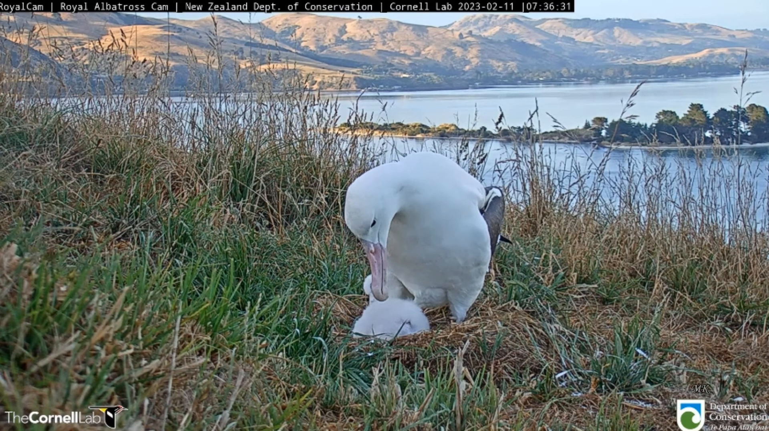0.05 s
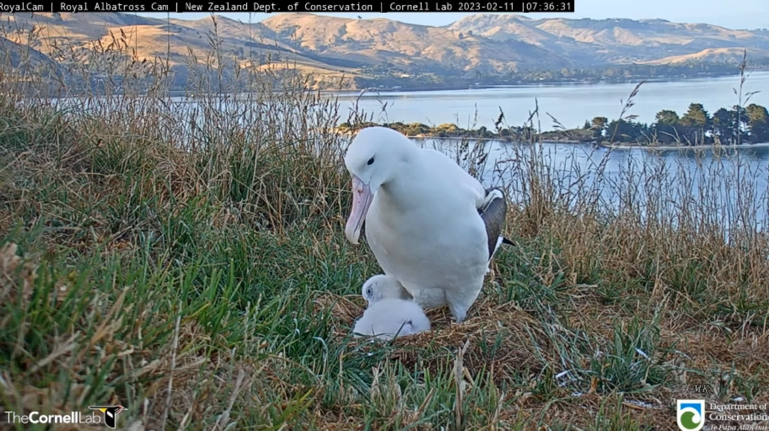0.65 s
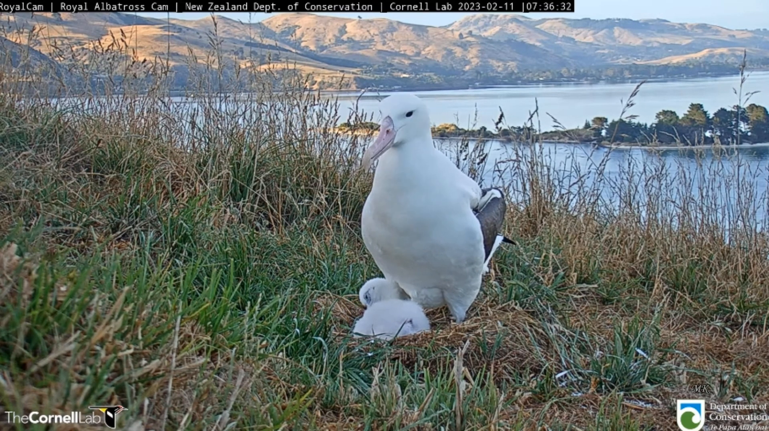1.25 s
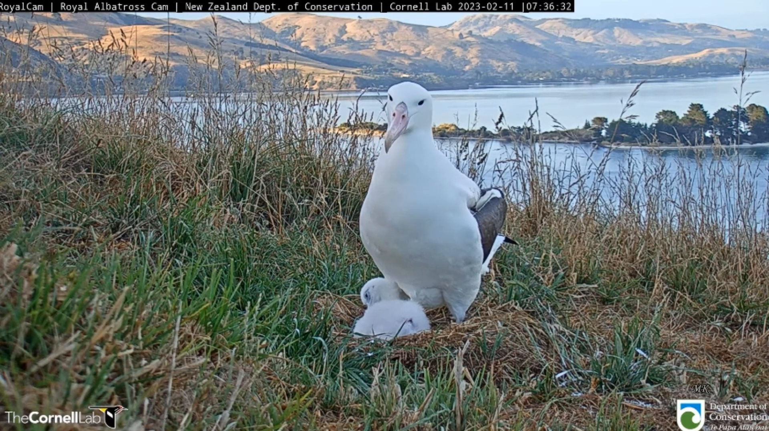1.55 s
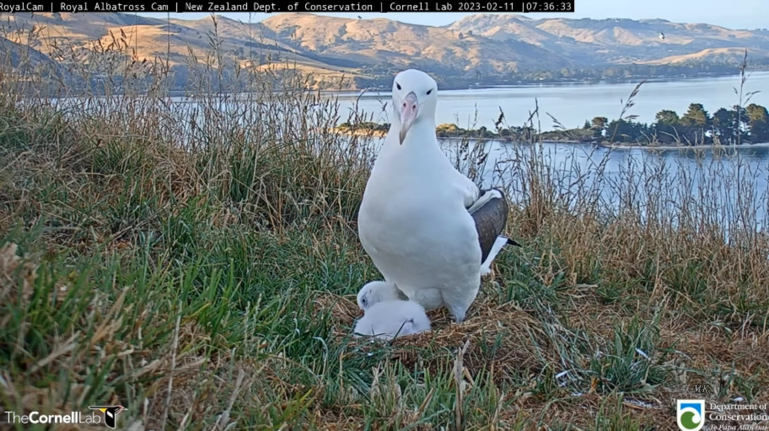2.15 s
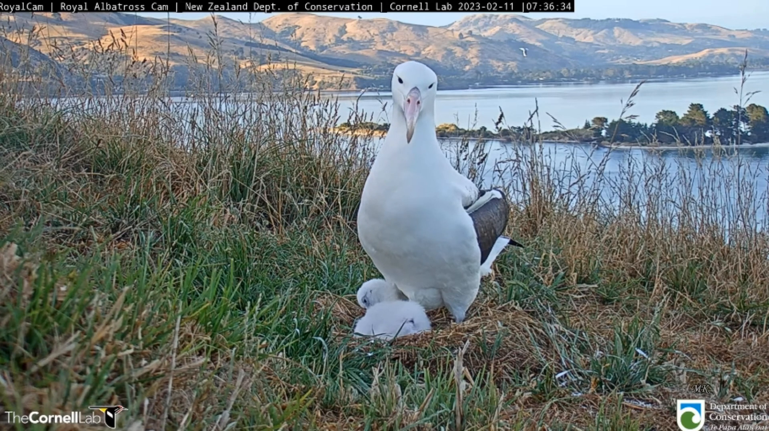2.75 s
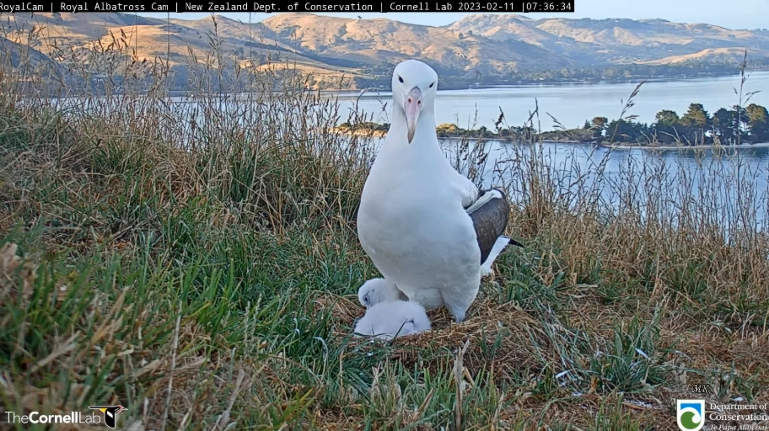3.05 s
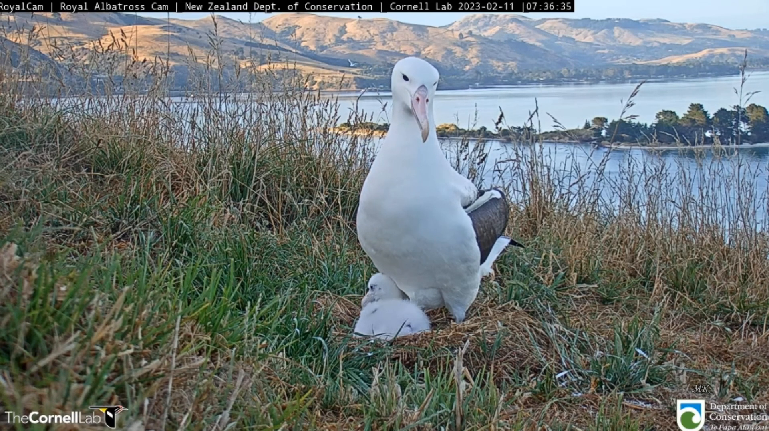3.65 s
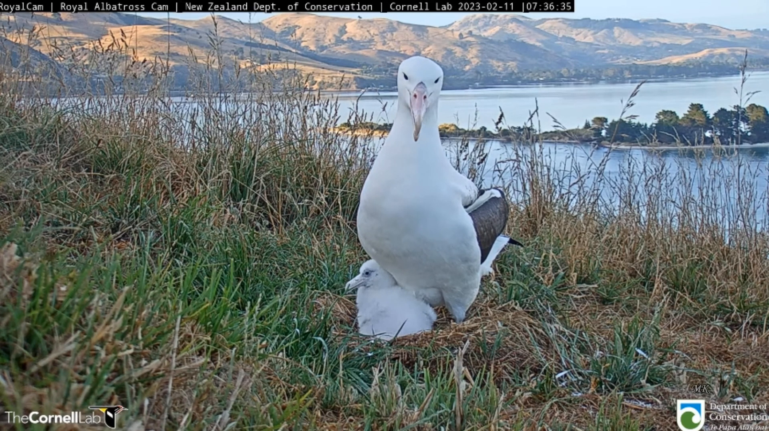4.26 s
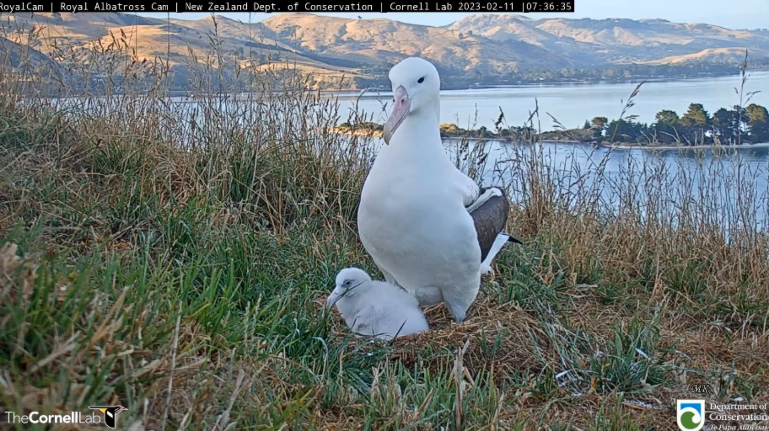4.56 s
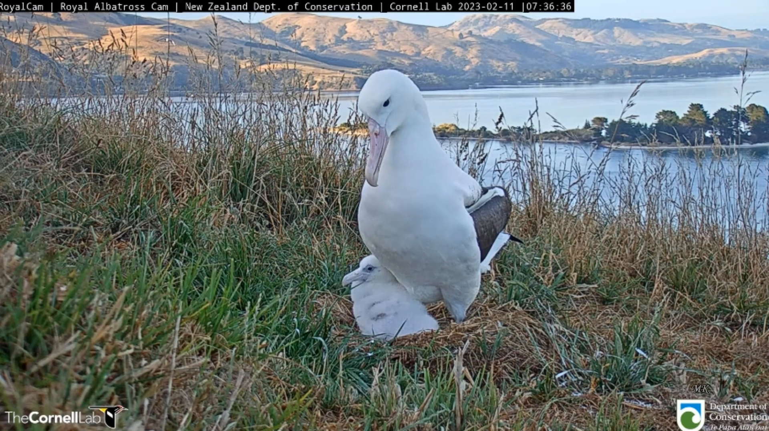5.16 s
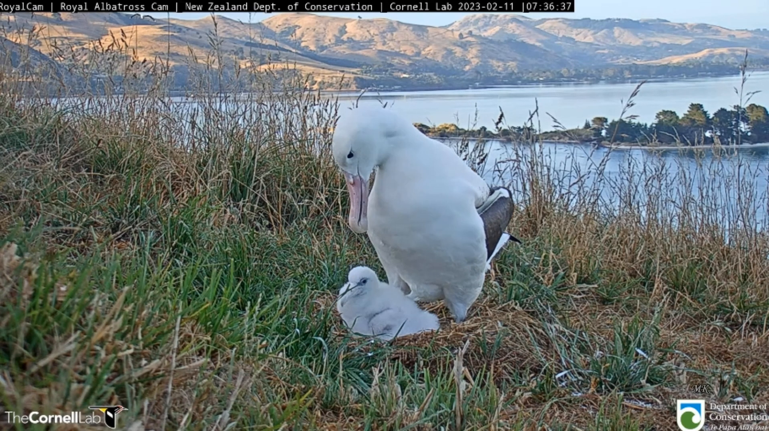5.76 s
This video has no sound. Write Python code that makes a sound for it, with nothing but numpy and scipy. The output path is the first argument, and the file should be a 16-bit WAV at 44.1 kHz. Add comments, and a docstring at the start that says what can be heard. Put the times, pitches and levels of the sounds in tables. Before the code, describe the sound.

A near gull gives two harsh, rattling calls over small birds chirping, a distant seabird colony and soft wind.

```python
"""A grassy headland above a harbour, with a seabird colony. A near gull gives two harsh, rattling calls:
a high tone chopped into bursts by the syrinx and shaped by throat and beak. Further off, small birds
chirp and scold in short glides, young birds whistle and beg in pulsed buzzes, and other gulls call.
Dry grass ticks; the colony blends into a high wash of noise. Under it lie soft wind, low tones that
beat into a throb, and a faint electric whine."""
import sys
import numpy as np
from scipy import signal
from scipy.fft import rfft, irfft, next_fast_len
from scipy.io import wavfile
from scipy.ndimage import uniform_filter1d

SR = 44100
rng = np.random.default_rng(int(sys.argv[2]) if len(sys.argv) > 2 else 0)


def unload_audio(sound):
    """Save the sound as a 16-bit wav file, at the path given as the first command line argument."""
    columns = np.transpose(np.atleast_2d(sound))
    # keep every value between -1 and 1, then stretch to whole-number steps
    steps = np.round(np.clip(columns, -1, 1) * 32767)
    wavfile.write(sys.argv[1], SR, steps.astype(np.int16))


N = 256220
TIME_S = np.arange(N) / SR

# near gull calls: attack/s, attack rise/dB, crest delay/s, f/Hz, level/dB, sag/(dB/s),
# roughness/0-1, beak opening/0-1, final fade/dB, final drop/share of f
GULL_CALLS = [(.0285, 36, .054, 1338, -18.5, 14.5, 0.49, 0.27, 34, .42),
              (.034, 17, .044, 1422, -19, 26, 0.69, 0.86, 15.5, 0.3)]
# syrinx rattle of each call: t/s, burst rate/Hz
RATTLE_1 = [(1.582, 78), (1.612, 85), (1.64, 92), (1.70, 91), (1.775, 89), (1.825, 79), (1.92, 54)]
RATTLE_2 = [(4.528, 80), (4.555, 82), (4.571, 90), (4.595, 104), (4.675, 93), (4.745, 88), (4.825, 66)]
# near gull harmonics: multiple, gain with beak nearly shut/dB, gain with beak wide/dB
GULL_HARMONICS = [(1, -25, -14), (2, 1, 4), (3, -29, 2), (4, -41, -32.5), (5, -39.5, -22.5)]
# gull throat response: f/Hz, gain/dB
THROAT = [(700, -18), (1100, -8), (1350, 2.5), (1650, 1.5), (2000, -14), (2180, 1.5), (2700, 2.5),
          (3200, 1), (3800, 6), (4800, 5.5), (5300, -1), (6300, 3), (7100, -3)]
# songbird chirps: t/s, length/s, f/Hz, rise/share of f, level/dB
CHIRPS = [(0.715, 0.034, 4390, 0.024, -42.5), (0.793, 0.032, 4280, -0.021, -45),
          (0.888, 0.023, 4360, .05, -45.5), (0.945, 0.055, 4210, 0.081, -42.5),
          (1.001, 0.044, 4210, -.12, -43.5), (2.036, 0.042, 4370, 0.061, -46.5),
          (2.133, .034, 4360, 0, -45), (2.231, .024, 4350, .04, -50), (2.39, 0.063, 3340, .11, -44.5),
          (2.71, 0.024, 3820, 0.032, -43.5), (2.902, 0.028, 3810, 0.038, -37.5),
          (3.233, 0.036, 3770, 0.14, -38.5), (3.322, 0.039, 3850, .1, -38.5),
          (3.44, 0.051, 3680, -.04, -39.5), (4.052, .025, 3650, -.05, -46),
          (4.372, 0.033, 3836, 0.036, -35), (4.459, 0.037, 4040, .03, -40.5),
          (4.923, 0.019, 4370, .03, -49), (5.592, 0.061, 5340, .06, -53), (5.687, 0.049, 5380, -0.076, -51),
          (5.763, 0.018, 3950, -0.044, -42)]
# two-voiced scolds: t/s, length/s, f/Hz, upper level/dB, lower level/dB
SCOLDS = [(0.096, 0.043, 3454, -36, -29.5), (0.208, 0.037, 3487, -32, -30.5),
          (0.284, 0.048, 3210, -31, -36), (0.364, 0.038, 3020, -34.5, -53),
          (0.607, 0.025, 3300, -35.5, -40.5), (5.78, 0.034, 3150, -42.5, -52)]
# distant gull calls: t/s, length/s, f/Hz, level/dB
FAR_GULLS = [(1.07, 0.2, 1654, -49.5), (1.40, 0.21, 1594, -53.5), (2.53, 0.27, 1420, -44),
             (2.57, 0.21, 1665, -48), (2.89, 0.46, 1604, -55.5), (3.84, 0.064, 1580, -50),
             (4.14, 0.26, 1440, -44), (5.5, 0.33, 1376, -47.5)]
# their harmonics: multiple, gain/dB
FAR_GULL_HARMONICS = [(1, -20), (2, 6), (3, -4.5), (4, -19)]
# begging buzzes: t/s, length/s, f/Hz, level/dB
BUZZES = [(1.08, 0.49, 1857, -51), (2.03, .55, 1826, -51), (2.83, 0.47, 1808, -52), (3.55, 0.31, 1778, -50),
          (4.16, 0.3, 1768, -50), (4.835, 0.24, 1740, -52.5)]
# their harmonics: multiple, gain/dB
BUZZ_HARMONICS = [(2, 9.5), (3, -13.5), (4, -12.5)]
# arched whistles: t/s, length/s, top f/Hz, level/dB
WHISTLES = [(0.284, 0.43, 5790, -54.5), (1.002, 0.44, 5760, -55.5), (1.776, 0.4, 5790, -55.5),
            (2.5, 0.42, 5730, -57.5), (3.201, 0.38, 5620, -65.5), (3.96, 0.35, 5620, -73),
            (4.692, 0.47, 5500, -69), (5.44, 0.5, 5570, -64)]
# falling whistles: t/s, length/s, first f/Hz, last f/Hz, level/dB
SLURS = [(0.413, 0.13, 5340, 4150, -58), (2.158, 0.15, 4920, 3950, -60), (2.313, .2, 5480, 4500, -62.5)]
# grass ticks at the nest: t/s, peak level/dB
GRASS_TICKS = [(1.140, -28.5), (1.153, -29), (1.186, -38), (1.192, -33.5), (1.417, -42), (4.5981, -12.5)]
# colony chatter: t/s, level/dB
COLONY_LEVEL = [(0, -40.5), (.6, -45), (1.05, -44), (2.7, -44), (3.85, -44.5), (4.3, -42.5), (5.35, -46.5),
                (5.81, -42.5)]
# noise spectra: f/Hz, relative density/dB
COLONY_SPECTRUM = [(1200, -25), (1950, -19), (2250, -3), (2550, 0.5), (2800, 2), (3150, -3), (3600, -6.5),
                   (3950, -12.5), (4250, -21.5), (4800, -15.5), (5300, -32), (6900, -33), (7600, -53.5)]
WIND_SPECTRUM = [(20, -1.5), (32, 6), (42, 3), (68, 5.5), (90, 4.5), (110, 0), (140, -5), (250, -13.5),
                 (480, -7.5), (600, -10.5), (780, -8), (1100, -18.5), (1900, -19), (4000, -50)]
# background tones: f/Hz, rms level/dB
DRONE_TONES = [(31.3, -50), (61, -49.5), (68, -47), (75.5, -56), (117.5, -61)]
WHINE_TONES = [(352, -71.5), (469, -60.5), (586, -65), (820, -64.5), (2812.5, -54), (3281, -59)]
# treble roll-off: f/Hz, gain/dB
TREBLE_CUT = [(7150, 0), (7500, -12), (7800, -30), (8100, -70)]


def near_gull(call, rattle, open_share, bend, rasp, flutter, flutter_hz, shimmer, beak_hz, treble_db):
    """High tone chopped into bursts; when forced, a second vibration and chaos tear its harmonics."""
    t = np.arange(rattle[0][0], rattle[-1][0], 1 / SR)
    pitch_hz, level_db, rough, beak = gull_contours(t - t[0], *call)
    burst, lift = syrinx(interpolate(rattle, t), open_share, leak=.18)
    flutter_phase = 2 * np.pi * cycles(flutter_hz * (1 + .1944 * drift(150, t)))
    detune = bend * lift + rasp * drift(400, t) + flutter * np.sin(flutter_phase)
    phase = 2 * np.pi * cycles(pitch_hz * (1 + rough * detune))
    voice = np.zeros(len(t))
    for k, shut_db, wide_db in GULL_HARMONICS:
        jitter_rad = .91 * rough * drift(150, t)
        voice += from_db(shut_db + beak * (wide_db - shut_db)) * np.sin(k * phase + jitter_rad)
    voice *= 1 + shimmer * rough * np.cos(flutter_phase)
    breath = from_db(-34 + 13 * beak) * drift(4500, t)
    voice = coloured(voice + breath, THROAT)
    voice = coloured(voice, [(beak_hz, 0), (2 * beak_hz, treble_db)])
    voice /= np.sqrt(uniform_filter1d(voice ** 2, size=400) + 1e-12)   # effort alone sets loudness
    effort = from_db(level_db + rough * drift(80, t))
    out = np.zeros(N)
    add(out, t[0], voice * burst * effort * signal.windows.tukey(len(t), .04))
    return out


def gull_contours(age_s, attack_s, attack_db, crest_s, pitch_hz, level_db, sag_db_per_s,
                  rough, beak, fade_db, drop, release_s=.078):
    """Rough start, pure loud crest with the beak narrowed, harsh sagging hold, collapse."""
    starting = np.clip(1 - age_s / attack_s, 0, 1)
    failing = np.clip(1 - (age_s[-1] - age_s) / release_s, 0, 1)
    crest = np.exp(-np.abs(age_s - crest_s) / .0209)
    scoop = np.exp(-age_s / .03)
    hz = pitch_hz * (1 - .12 * scoop + .0308 * crest - .16 * age_s - drop * failing)
    db = level_db + 6.5 * crest - attack_db * starting - sag_db_per_s * age_s - fade_db * failing
    pure = bump(age_s, crest_s - .012, width_s=.023)
    roughness = rough * (1 - pure) + .3 * starting + .75 * np.sqrt(failing)
    narrowing = bump(age_s, crest_s, width_s=np.where(age_s < crest_s, .017, .052))
    return hz, db, np.clip(roughness, 0, 1), beak * (1 - .88 * narrowing)


def syrinx(rate_hz, open_share, leak):
    """Opens and shuts: round-topped bursts (rms 1) and the pitch lift within each (-1 to 1)."""
    turn = cycles(rate_hz) % 1
    opening = np.sin(np.pi * np.clip(turn / open_share, 0, 1) ** .73) ** 2
    return unit_rms(np.tanh(3.1 * opening) + leak), np.sin(2 * np.pi * (turn - .35))


def chirps(end_ratio=1.055):
    """Clear scooped notes on a rising or falling slant."""
    notes = [(start_s, length_s, hz * (end_ratio - rise / 2), hz, hz * (end_ratio + rise / 2), db)
             for start_s, length_s, hz, rise, db in CHIRPS]
    return glides(notes, waver=.0085, overtone_db=-47)


def scolds(lower_ratio=.752, lower_delay_share=.31):
    """Hoarse notes drop onto their pitch under a faint partial; a lower voice joins late."""
    notes = []
    for start_s, length_s, pitch_hz, upper_db, lower_db in SCOLDS:
        voices = [(1, 0, upper_db), (lower_ratio, lower_delay_share, lower_db), (1.33, 0, upper_db - 18)]
        for ratio, late, db in voices:
            hz = ratio * pitch_hz
            notes.append((start_s + late * length_s, (1 - late) * length_s, 1.07 * hz, hz, 1.02 * hz, db))
    return glides(notes, waver=.032, overtone_db=-38.5)


def twitter(around, count, level_db, low_hz, high_hz, glide, spread_s):
    """Faint random notes around the clear ones; the higher, the softer."""
    notes = []
    for pick, when, length, height, first, last in rng.random((count, 6)):
        start_s = around[int(pick * len(around))][0] + spread_s * (when - .5)
        hz = low_hz * (high_hz / low_hz) ** height
        first_hz, last_hz = hz * (1 + glide * (first - .3)), hz * (1 + glide * (last - .6))
        notes.append((start_s, .015 + .027 * length, first_hz, hz, last_hz, level_db + 12 * (.5 - height)))
    return glides(notes, waver=.0047, overtone_db=-42)


def glides(notes, waver, overtone_db):
    """Songbird voice: a wavering tone and its faint octave glide through three pitches."""
    out = np.zeros(N)
    for start_s, length_s, first_hz, middle_hz, last_hz, level_db in notes:
        u = progress(length_s)
        hz = np.polyval(np.polyfit([0, .5, 1], [first_hz, middle_hz, last_hz], 2), u)
        phase = 2 * np.pi * cycles(hz * (1 + waver * drift(400, u)))
        note = np.sin(phase) + from_db(overtone_db) * np.sin(2 * phase)
        add(out, start_s, note * from_db(level_db) * signal.windows.tukey(len(u), .5))
    return out


def pulsed_calls(calls, harmonics, pulse_hz, rasp, bend, sag_per_s, fade_db):
    """Far rattles and buzzes; pitch, pulse rate and level sag as the bird runs out of air."""
    out = np.zeros(N)
    for start_s, length_s, pitch_hz, level_db in calls:
        u = progress(length_s)
        ratio = 1 - sag_per_s * (u - .1) * length_s - .03 * np.exp(-u / .04)
        rate_hz = pulse_hz * ratio ** 3 * (1 + .022 * drift(30, u))
        burst, lift = syrinx(rate_hz, open_share=.52, leak=.027)
        phase = 2 * np.pi * cycles(pitch_hz * ratio * (1 + bend * lift + rasp * drift(430, u)))
        voice = sum(from_db(db) * np.sin(k * phase) for k, db in harmonics)
        envelope = from_db(level_db + fade_db * u) * signal.windows.tukey(len(u), .15)
        add(out, start_s, voice * burst * envelope)
    return out


def whistles(depth=.22, skew=.58, waver=.0015):
    """Young birds: thin, nearly pure tones that rise fast, round off and sink slowly."""
    out = np.zeros(N)
    for start_s, length_s, top_hz, level_db in WHISTLES:
        u = progress(length_s)
        below_top = (1 - np.sin(.95 * np.pi * u / (u + skew * (1 - u)))) ** 1.1
        hz = top_hz * (1 - depth * below_top + waver * (drift(200, u) + drift(34, u)))
        db = level_db - 3 * below_top - 6 * (u - .3) + 2.6 * drift(34, u)
        add(out, start_s, np.sin(2 * np.pi * cycles(hz)) * from_db(db) * signal.windows.tukey(len(u), .1))
    return out


def slurs():
    """Faint whistles sliding straight down."""
    notes = [(start_s, length_s, first_hz, (first_hz + last_hz) / 2, last_hz, db)
             for start_s, length_s, first_hz, last_hz, db in SLURS]
    return glides(notes, waver=.004, overtone_db=-44)


def grass_ticks(t60_s=.0017):
    """Dry grass snaps: bright noise bursts that die at once."""
    out, t = np.zeros(N), np.arange(SR // 50) / SR
    bright = signal.butter(2, [2800, 8000], "band", fs=SR, output="sos")
    for start_s, peak_db in GRASS_TICKS:
        snap = signal.sosfilt(bright, rng.standard_normal(len(t)) * from_db(-60 * t / t60_s))
        add(out, start_s, from_db(peak_db) * snap / np.abs(snap).max())
    return out


def hillside(x, t60_s):
    """Grass and slope scatter a short, diffuse tail."""
    t = np.arange(SR // 2) / SR
    tail = rng.standard_normal(len(t)) * from_db(-60 * t / t60_s) * (t > .004)
    return signal.fftconvolve(x, tail / np.sqrt(np.sum(tail ** 2)))[:N]


def colony(rattle_hz=84):
    """Countless far voices merge into a rattling noise band around their strongest harmonic."""
    wash = unit_rms(coloured(rng.standard_normal(N), COLONY_SPECTRUM))
    rattle = 1 + .17 * np.sin(2 * np.pi * cycles(rattle_hz * (1 + .1 * drift(8, TIME_S))))
    return wash * rattle * from_db(interpolate(COLONY_LEVEL, TIME_S) + drift(43, TIME_S))


def wind(level_db=-44.5):
    """Soft, steady, bass-heavy noise."""
    return from_db(level_db) * unit_rms(coloured(rng.standard_normal(N), WIND_SPECTRUM))


def drone(wander_hz=.68):
    """Low wandering tones beat into a throb."""
    out = np.zeros(N)
    for hz, db in DRONE_TONES:
        turns = cycles(hz + wander_hz * drift(2.7, TIME_S)) + rng.random()
        out += np.sqrt(2) * from_db(db) * np.sin(2 * np.pi * turns)
    return out


def whine():
    """Faint, steady electric tones."""
    return np.sqrt(2) * sum(from_db(db) * np.sin(2 * np.pi * hz * TIME_S) for hz, db in WHINE_TONES)


def from_db(db):
    """Decibels to gain."""
    return 10 ** (np.asarray(db) / 20)


def unit_rms(x):
    """Scale to rms 1."""
    return x / np.sqrt(np.mean(x ** 2) + 1e-20)


def interpolate(rows, t):
    """Straight lines through (t/s, value) rows."""
    return np.interp(t, *np.transpose(rows))


def coloured(x, curve):
    """Filter by an (f/Hz, gain/dB) curve."""
    hz, db = np.transpose(curve)
    size = next_fast_len(len(x) + 2048)
    bins_hz = np.maximum(np.arange(size // 2 + 1) * SR / size, 1)
    gain = from_db(np.interp(np.log(bins_hz), np.log(hz), db))
    return irfft(rfft(x, size) * gain, size)[:len(x)]


def drift(rate_hz, like):
    """Random wander up to about rate_hz, spread 1."""
    sos = signal.butter(2, rate_hz, fs=SR, output="sos")
    return unit_rms(signal.sosfilt(sos, rng.standard_normal(len(like) + SR // 2)))[SR // 2:]


def cycles(hz):
    """Running phase in cycles."""
    return np.cumsum(hz) / SR


def progress(length_s):
    """0 to 1 over a note."""
    return np.linspace(0, 1, int(length_s * SR))


def bump(t, centre_s, width_s):
    """Gaussian of height 1."""
    return np.exp(-((t - centre_s) / width_s) ** 2)


def add(out, start_s, sound):
    """Mix in at start_s."""
    at = max(round(start_s * SR), 0)
    out[at:at + len(sound)] += sound[:max(N - at, 0)]


def scene():
    """Mono mix: near calls almost dry, far ones with more hillside."""
    near = near_gull(GULL_CALLS[0], RATTLE_1, open_share=.76, bend=.067, rasp=.075,
                     flutter=.085, flutter_hz=306.8, shimmer=.69, beak_hz=2870, treble_db=-8.5)
    near += near_gull(GULL_CALLS[1], RATTLE_2, open_share=.87, bend=.043, rasp=.076,
                      flutter=.21, flutter_hz=646, shimmer=.71, beak_hz=4730, treble_db=-6.5)
    far = pulsed_calls(BUZZES, BUZZ_HARMONICS, pulse_hz=91.75, rasp=.011, bend=.011,
                       sag_per_s=.26, fade_db=-11.5)
    far += pulsed_calls(FAR_GULLS, FAR_GULL_HARMONICS, pulse_hz=86.3, rasp=.018, bend=.05,
                        sag_per_s=.15, fade_db=-9.5)
    far += scolds()
    far += twitter(SCOLDS, count=18, level_db=-45, low_hz=2810, high_hz=4600, glide=.18, spread_s=.03)
    far += chirps()
    far += twitter(CHIRPS, count=48, level_db=-49, low_hz=2960, high_hz=4430, glide=.14, spread_s=.2)
    far += whistles() + slurs()
    echoes = from_db(-23) * hillside(near, t60_s=.2) + from_db(-10.5) * hillside(far, t60_s=.16)
    return (near + far + echoes + grass_ticks() + colony() + wind() + drone() + whine())[None]


def record(dry):
    """Band limit: deepest bass and top treble roll off."""
    highpass = signal.butter(2, 18, "high", fs=SR, output="sos")
    return coloured(signal.sosfilt(highpass, dry[0]), TREBLE_CUT)[None]


dry = scene()
out = record(dry)
unload_audio(out)
```